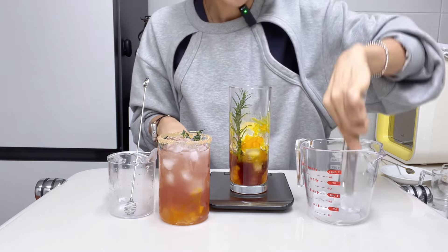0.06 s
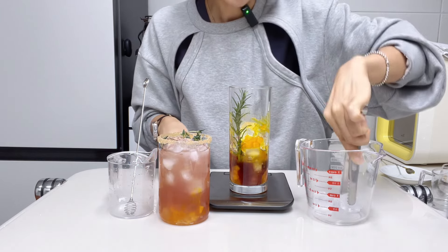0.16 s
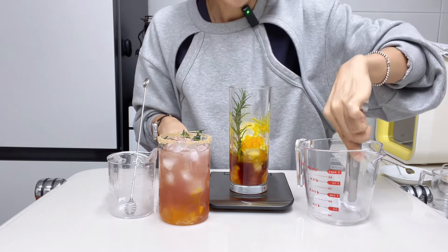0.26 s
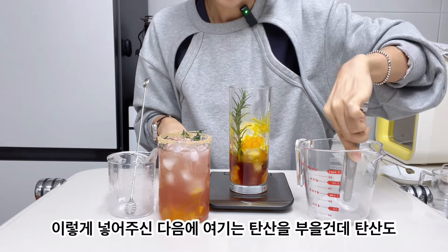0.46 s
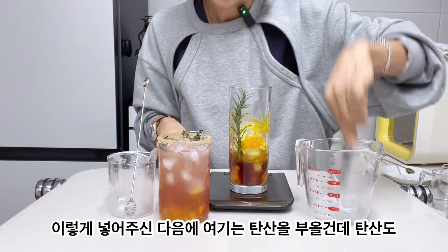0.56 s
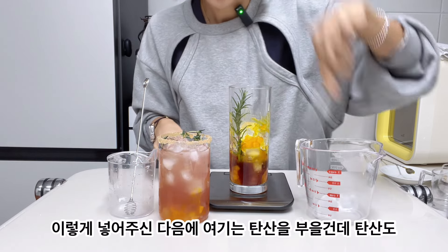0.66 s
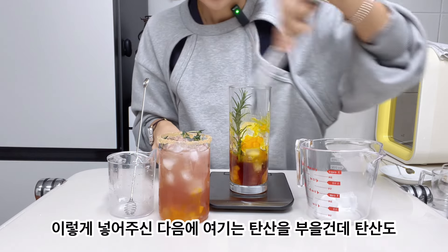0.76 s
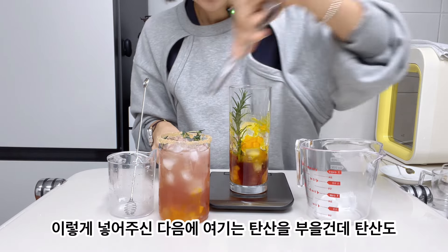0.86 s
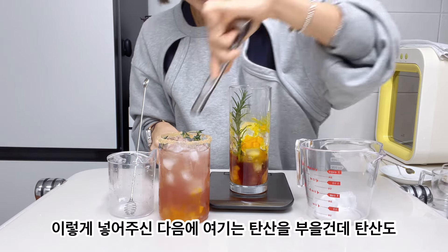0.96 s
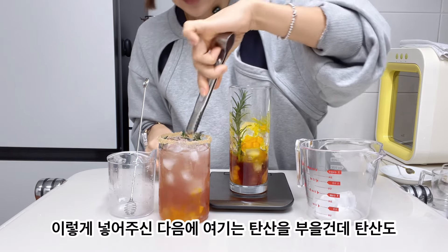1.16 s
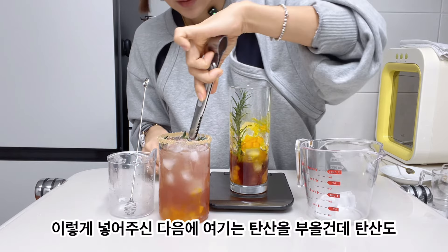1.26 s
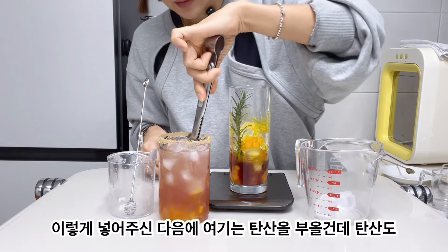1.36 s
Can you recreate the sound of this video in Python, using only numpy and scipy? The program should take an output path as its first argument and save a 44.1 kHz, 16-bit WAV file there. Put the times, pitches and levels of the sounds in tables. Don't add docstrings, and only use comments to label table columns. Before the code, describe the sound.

Ice cubes knock and rattle in a plastic jug as tongs dig in. A light, uneven clatter runs from about 0.12 to 0.33 s; a much louder, sharper burst hits at 0.45 s, with bright cracks and hollow wall knocks settling by 0.65 s. A faint dull tap comes at 0.81 s and soft cloth rustle at 1.08 s, in a small hard-walled room with low hiss.

```python
import sys
import numpy as np
from scipy import signal
from scipy.fft import rfft, irfft
from scipy.io import wavfile

SR = 44100
rng = np.random.default_rng(int(sys.argv[2]) if len(sys.argv) > 2 else 0)


def voltage_ratio(decibels):
    exponent = np.asarray(decibels, float) / 20
    return 10 ** exponent


def dump_mix(stems):
    frames = np.atleast_2d(stems).T
    limited = np.clip(frames, -1, 1)
    pcm = np.round(limited * 32767).astype(np.int16)
    wavfile.write(sys.argv[1], SR, pcm)


N = 61739

# pitch in Hz, level in dB, time to fade by 60 dB in seconds.
WALL_NOTES = [(1290, -9.5, .02), (1643, -1.5, 0.012), (1770, -7, .03), (1891.5, 0.5, 0.11),
              (2114, 3, 0.042), (2154, -3, 0.1), (2292, -10, .05), (2960, -6, .015), (3200, -11, .02),
              (3417, -3, 0.027), (3707, -3, 0.049), (3795, -5, .04), (4180, -3, .035), (4450, -8.5, .03)]
# pitch in Hz, level in dB,
# time to fade by 60 dB in seconds.
HOLLOW_NOTES = [(179, -12, 0.075), (383.4, -12, 0.1), (580, -19, .023), (761, 5, 0.078), (800, -2.5, 0.059),
                (905, -11.5, .02)]
FOCUS_OCT, FOCUS_DB = .2, 9
CONTACT_S = .0006


def rings(modes, length=.5):
    hz, db, t60 = np.array(modes, float).T[:, :, None]
    t = np.arange(int(length * SR)) / SR
    return voltage_ratio(db - 60 * t / np.maximum(t60, .002)) * np.sin(2 * np.pi * hz * t)


def burst(noise, decay_s):
    t = np.arange(len(noise)) / SR / decay_s
    x = noise * t * np.exp(-t)
    return x / np.sqrt(np.sum(x ** 2))


def add(out, at_s, x):
    i = int(at_s * SR)
    out[i:i + len(x)] += x[:N - i]


def band(x, lo_hz, hi_hz):
    return signal.sosfilt(signal.butter(2, [lo_hz, min(hi_hz, .45 * SR)], "band", fs=SR, output="sos"), x)


def unit(x):
    return x / np.sqrt(np.mean(x ** 2))


def peak_unit(x):
    return x / np.abs(x).max()


def level_curve(points):
    t = np.arange(N) / SR
    return voltage_ratio(np.interp(t, *np.array(points).T, left=-140, right=-140))


def floor():
    # pitch in Hz, level in dB per Hz.
    hiss_colour = np.array([(15, -31), (25, -1.5), (212, -0.5), (463, -7.5), (677, -5.5), (1610, -13),
                            (1790, -16), (14800, -24), (16000, -26)])
    hz = np.maximum(np.arange(N // 2 + 1) * SR / N, 20)
    gain = voltage_ratio(np.interp(np.log(hz), np.log(hiss_colour[:, 0]), hiss_colour[:, 1]))
    return voltage_ratio(-69) * unit(irfft(rfft(rng.standard_normal(N)) * gain, N))


def cracks():
    # start in seconds, level in dB, ring pitch in Hz, time to fade by 60 dB in seconds.
    ice_hits = [(0.05, -49, 12500, 0.019), (0.12, -39.5, 11950, 0.0095), (0.1282, -26, 12800, 0.021),
                (0.1362, -26, 14600, 0.015), (0.153, -39.5, 14400, 0.0069), (0.1675, -31.5, 14700, 0.0081),
                (0.174, -28, 12000, 0.021), (0.185, -37, 14400, 0.0084), (0.206, -37.5, 10240, 0.0064),
                (0.224, -36.5, 10200, 0.0033), (0.255, -52, 10800, 0.02), (0.2623, -46.5, 9800, 0.0064),
                (0.29, -49, 14200, 0.007), (0.3084, -52.5, 11700, 0.0039), (0.3183, -47.5, 13100, 0.014),
                (0.446, -13, 14100, 0.0033), (0.4559, -13, 12550, 0.011), (0.459, -17, 13600, 0.007),
                (0.4713, -12.5, 14300, 0.007), (0.5222, -24, 15000, 0.003), (0.5314, -17, 12700, 0.0025),
                (0.5348, -20.5, 12900, 0.007), (0.5682, -23, 13100, 0.0056), (0.612, -41.5, 11870, 0.0077),
                (0.6196, -45, 12700, 0.01), (1.3793, -61.5, 9170, 0.008)]
    crack_s, crack_db = 0.0012, -2
    chip_s, chip_db = 0.0019, -3.5
    snap = 0.99
    longest_t60_s = .011
    out = np.zeros(N)
    for start_s, db, hz, t60 in ice_hits:
        t60 = min(t60, longest_t60_s)
        hit = burst(rng.standard_normal(800), crack_s)
        hit[int(crack_s * SR)] += snap
        notes = rings([(hz, 0, t60), (hz * .78, -9, t60), (hz * 0.97, -12, t60)], .05).sum(axis=0)
        crack = peak_unit(band(signal.fftconvolve(hit, notes), 7770, 18000))
        chips = band(burst(rng.standard_normal(800), chip_s), 8500, 16000)
        crack[:len(chips)] += voltage_ratio(chip_db) * peak_unit(chips)
        add(out, start_s, voltage_ratio(db + crack_db) * crack)
    return out


def table():
    # time in seconds, level in dB.
    shaking = [
        [(.121, -37), (.17, -41.5), (.22, -49), (.33, -81)],
        [(.447, -40.5), (.49, -34.5), (.6, -47), (.72, -50)],
    ]
    level = sum(level_curve(points) for points in shaking)
    rumble = unit(band(rng.standard_normal(N), 39.0, 220))
    return voltage_ratio(-18.5) * band(level * rumble, 30, 300)


def rattle():
    # time in seconds, level in dB.
    settling = [
        [(.121, -50.5), (.16, -50), (.19, -40.5), (.27, -49.5), (.30, -65.5), (.34, -60.5)],
        [(.447, -29.5), (.49, -33.5), (.518, -44), (.53, -40.5), (.59, -40.5), (.64, -64.5)],
    ]
    # lowest Hz, highest Hz, level in dB.
    grain_bands = [(720, 2300, 0.5), (3090, 4500, -4.5), (4700, 6200, -9)]
    lean_hz = (1760, 2107)
    ticks_per_s, spread_db, size_cap = 1400, 0.5, 1.6
    rattle_db, hollow_db, grit_db, ice_db = -4.5, -4, 2, -9

    levels = [level_curve(points) for points in settling]
    happens = rng.random(N) < ticks_per_s / SR
    size = voltage_ratio(spread_db * np.minimum(rng.exponential(size=N), size_cap))
    ticks = happens * size * rng.standard_normal(N)
    grains = signal.fftconvolve(ticks, burst(rng.standard_normal(200), 0.00081))[:N]

    def through(modes):
        return unit(signal.fftconvolve(ticks, rings(modes, 0.204).sum(axis=0))[:N])

    def leaning_wall(focus_hz):
        modes = []
        for hz, db, t60 in WALL_NOTES:
            distance = min(abs(np.log2(hz / focus_hz)) / FOCUS_OCT, 1.5)
            modes.append((hz, db - FOCUS_DB * (hz < 2600) * distance, t60))
        return modes

    wall = sum(level * through(leaning_wall(hz)) for level, hz in zip(levels, lean_hz))
    grit = 0
    for lo, hi, db in grain_bands:
        grit = grit + voltage_ratio(db) * unit(band(band(ticks, lo, hi), lo, hi))
    ice = unit(band(band(grains, 7600, 16000), 8450, 19000))
    rest = voltage_ratio(hollow_db) * through(HOLLOW_NOTES) + voltage_ratio(grit_db) * unit(grit) + voltage_ratio(ice_db) * ice
    return voltage_ratio(rattle_db) * (wall + sum(levels) * rest)


def knocks():
    # start in seconds, level in dB,
    # hollow part in dB against the knock, brightest pitch in Hz, wall ring in dB.
    first_scoop = [(0.122, -45.5, -1, 1880, -7), (0.1291, -26.5, -10, 1780, -10),
                   (0.1364, -35.5, -11, 1700, -12), (0.143, -38, -1, 1850, -10.5),
                   (0.1644, -40.5, -8.5, 1740, -10.5), (0.176, -27.5, -6.5, 3320, -11.5),
                   (0.1934, -33, -20, 1600, -9.5), (0.2074, -28, -13.5, 1820, -8.5),
                   (0.2254, -20, -31, 1573, -5), (0.2304, -32.5, -20, 2170, -10.5),
                   (0.2508, -35.5, -5.5, 1870, -6), (0.2593, -28, -26.5, 1670, -13),
                   (0.2656, -28.5, -16.5, 1570, -11.5), (0.2844, -38.5, -4.5, 1770, -13),
                   (0.2925, -49, -11.5, 2190, -13), (0.3087, -35, -19, 1900, -11),
                   (0.3182, -31.5, -23, 1850, -9), (0.3253, -39, -17, 1842, -11.5)]
    second_scoop = [(0.4474, -10, -44, 2220, -1.5), (0.451, -17, -43, 2150, -1.5),
                    (0.4566, -8, -43, 2040, 0.5), (0.4579, -17.5, -29, 3700, -0.5),
                    (0.4600, -17.5, -25.5, 2230, -5), (0.464, -20.5, -27.5, 2020, 0.5),
                    (0.4709, -28.5, -26, 2170, -0.5), (0.474, -17, -20, 3860, -5),
                    (0.5224, -26, -8.5, 1630, -8), (0.5254, -21, -39, 2223, -6.5),
                    (0.5332, -14, -25.5, 2150, -3), (0.5364, -17.5, -16.5, 2060, -9.5),
                    (0.5404, -42, -30, 1889, 4), (0.5687, -18.5, -22, 1820, -8.5),
                    (0.5744, -24, -12.5, 1880, -5.5), (0.5812, -29.5, -11.5, 1850, 7),
                    (0.612, -27.5, -18, 1840, -10), (0.6214, -47, -21, 2110, 7)]
    # pitch in Hz, level in dB, time to fade by 60 dB in seconds.
    tongs_notes = [(2105, -26.5, .7), (2195, -26, 0.49), (2145, -25.5, .35), (2007, -34, .5),
                   (1880, -34.5, 0.41), (2060, -33.5, 0.31)]
    # pitch in Hz, level in dB.
    cube_colour = np.array([(1100, -7.5), (1600, 2), (2500, -5.5), (3400, 3.5), (4200, -6), (4800, -11.5),
                            (6000, -11)])
    knock_db, low_db, cube_db, tongs_db = -1.5, 6.5, -5, -11.5
    scuff, scatter_db, cube_t60_s, push_s = .25, 3, 0.039, 0.00017

    out, push = np.zeros(N), np.zeros(N)
    wall = rings(WALL_NOTES, .2)
    wall_hz = np.array(WALL_NOTES)[:, 0]
    hollow = rings(HOLLOW_NOTES, .2).sum(axis=0)
    for start_s, db, hollow_db, focus_hz, ring_db in list(first_scoop) + list(second_scoop):
        def near(hz):
            return FOCUS_DB * (np.exp(-(np.log2(hz / focus_hz) / FOCUS_OCT) ** 2) - 1)

        chance = rng.standard_normal(len(wall_hz))
        spot = voltage_ratio(ring_db + near(wall_hz) + scatter_db * chance)
        cube_hz = 1150 + 400 * (np.arange(12) + rng.random(12))
        cube_level = cube_db + near(cube_hz) * .9 + np.interp(cube_hz, *cube_colour.T)
        cube = rings([(hz, level, cube_t60_s) for hz, level in zip(cube_hz, cube_level)], .2)
        hit = scuff * burst(rng.standard_normal(200), CONTACT_S)
        hit[int(CONTACT_S * SR)] += 1
        ringing = spot @ wall + np.sign(chance[:12]) @ cube
        body = band(band(signal.fftconvolve(hit, ringing), 1100, 8000), 950, 8000)
        low = signal.fftconvolve(burst(np.ones(200), push_s), hollow)
        knock = peak_unit(body) + voltage_ratio(hollow_db + low_db) * peak_unit(low)
        add(out, start_s, voltage_ratio(db + knock_db) * knock)
        add(push, start_s, voltage_ratio(db + tongs_db + ring_db) * hit)
    return out + signal.fftconvolve(push, rings(tongs_notes, 0.85).sum(axis=0))[:N]


def pings():
    # start in seconds, level in dB, pitch in Hz.
    cube_notes = [(.1296, -30.5, 1776), (0.1298, -32.5, 3585), (.1295, -38, 5040), (0.142, -40.5, 1852),
                  (0.178, -33, 3348), (0.177, -36, 5717), (0.174, -37, 1820), (.181, -40.5, 3510),
                  (0.1934, -31.5, 1572), (.2075, -26.5, 1841), (0.209, -44.5, 4264), (.2205, -38.5, 3661),
                  (0.2273, -24.5, 1561), (.2258, -25, 2143), (0.2268, -34.5, 3790), (.2257, -41.5, 5050),
                  (.251, -31.5, 1529), (0.252, -34, 2972), (.2597, -34, 3758), (0.2617, -39, 2918),
                  (.4476, -12.5, 3499), (0.447, -19.5, 4210), (0.449, -23, 5512), (0.4491, -24, 1314),
                  (.457, -30, 1507), (.457, -22.5, 3693), (0.456, -17.5, 2918), (0.456, -24, 4900),
                  (0.473, -24.5, 1249), (.4742, -19.5, 3747), (0.491, -34, 4371), (0.5255, -39, 1540),
                  (.5255, -34, 3499), (.5334, -22.5, 3618), (0.5314, -30, 2832), (0.543, -30, 3844),
                  (.5688, -28.5, 1420), (.4476, -25.5, 2830), (.474, -29.5, 2961), (.474, -29, 4400),
                  (0.5693, -28.5, 4716), (0.5697, -25, 2767), (.581, -27.5, 3553)]
    out = np.zeros(N)
    for start_s, db, hz in cube_notes:
        t60 = .017 * (2000 / hz) ** .3
        note = rings([(hz, db, t60)], .06)[0]
        fade_in = np.minimum(np.arange(len(note)) / (CONTACT_S * SR), 1)
        add(out, start_s, note * fade_in)
    return out


def clicks():
    # start in seconds, level in dB.
    edge_hits = [(0.1319, -30.5), (0.177, -26.5), (.2080, -28.5), (.2262, -27), (0.4466, -17.5),
                 (0.4581, -11), (0.4608, -17), (.4746, -12), (0.5267, -23.5), (0.5341, -17.5), (.5368, -24),
                 (.5694, -17)]
    out = np.zeros(N)
    for start_s, db in edge_hits:
        out[int(start_s * SR)] = -3 * voltage_ratio(db)
    return band(out, 1070, 5194)


def room(x):
    # pitch in Hz, time to fade by 60 dB in seconds, level in dB.
    room_decay = [(155, .6, -2), (420, 0.26, -1), (756, .2, -11.5), (1400, .4, -11), (2340, 0.061, -15.5),
                  (3200, 0.47, -18), (5500, 0.31, -16), (8900, 0.072, -9.5), (14000, 0.17, -24)]
    gap_s = 0.0013
    t = np.arange(int(.8 * SR)) / SR
    tail = 0
    for hz, t60, db in room_decay:
        part = band(rng.standard_normal(len(t)), hz / 2.0, hz * 1.86)
        fade = voltage_ratio(db - 60 * t / t60) / np.sqrt(t60 * SR / 14)
        tail = tail + part * fade * (t > gap_s)
    return signal.fftconvolve(x, tail)[:N]


def tap_and_rustle():
    # pitch in Hz, level in dB, time to fade by 60 dB in seconds.
    tap_notes = [(607, -56.5, 0.028), (865.5, -65, 0.019), (987, -55, .021), (1137, -55, 0.019),
                 (2080, -65, .012), (2548, -69, .011), (3405, -69, 0.01), (4800, -60.5, 0.025)]
    tap_s, bounce_s, bounce_db = .8103, 0.0159, -13
    rustle_s, rise_s, rustle_t60_s, rustle_hz, rustle_db = 1.078, 0.0036, 0.29, 694, -64
    tap = np.zeros(N)
    notes = rings(tap_notes, .2)
    add(tap, tap_s, signal.fftconvolve(burst(np.ones(200), .00006), notes.sum(axis=0)))
    add(tap, tap_s + bounce_s, voltage_ratio(bounce_db) * notes[0])
    t = np.maximum(np.arange(N) / SR - rustle_s, 0)
    swell = (1 - np.exp(-t / rise_s)) * voltage_ratio(rustle_db - 60 * t / rustle_t60_s)
    cloth = unit(band(rng.standard_normal(N), rustle_hz / 3, rustle_hz * 2))
    return band(tap, 449, 5600) + swell * cloth


def scene():
    ice = knocks() + pings() + clicks() + cracks() + rattle()
    late = tap_and_rustle()
    thin = signal.sosfilt(signal.butter(2, 290, "high", fs=SR, output="sos"), ice)
    ice = thin + voltage_ratio(-24) * (ice - thin)
    echo = room(ice + voltage_ratio(-4.5) * late)
    return (ice + late + echo + table() + floor())[None]


def top_cut(x):
    return signal.sosfilt(signal.butter(12, 16640, fs=SR, output="sos"), x)


def record(dry):
    cut = signal.sosfilt(signal.ellip(8, .2, 70, 15500, fs=SR, output="sos"), dry)
    return top_cut(cut)


dry = scene()
out = record(dry)
dump_mix(out)
```